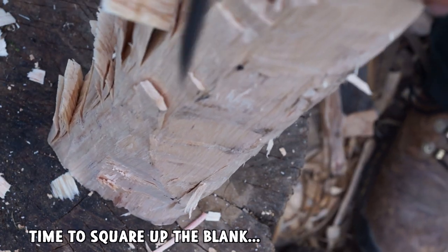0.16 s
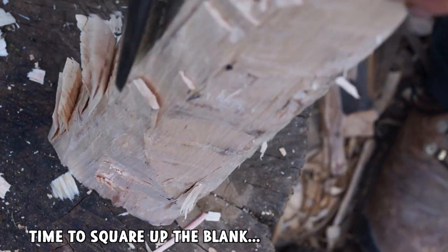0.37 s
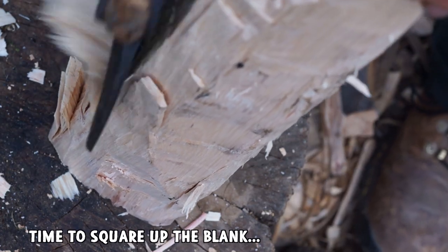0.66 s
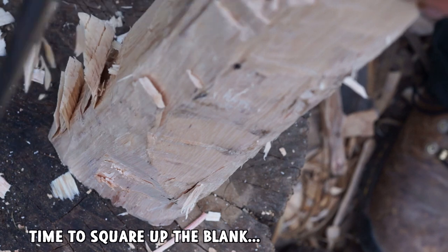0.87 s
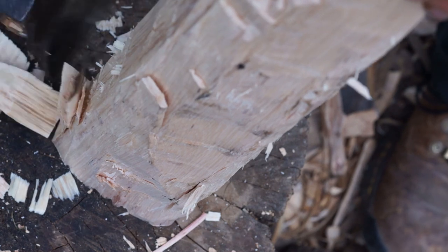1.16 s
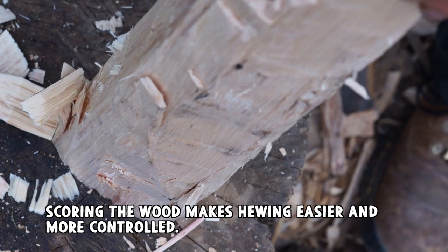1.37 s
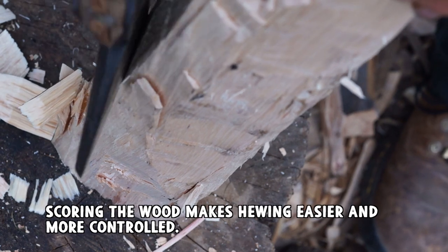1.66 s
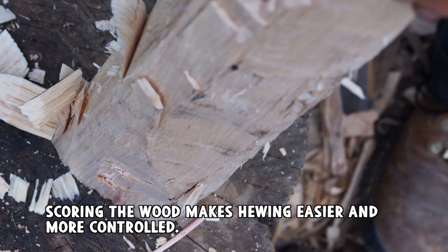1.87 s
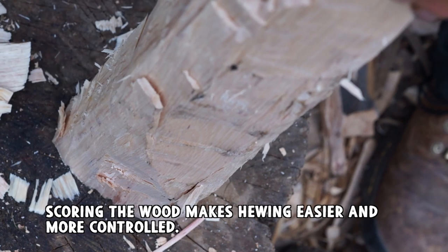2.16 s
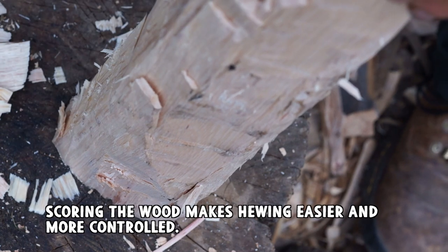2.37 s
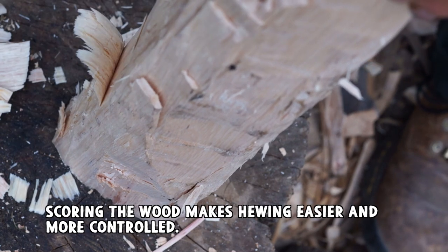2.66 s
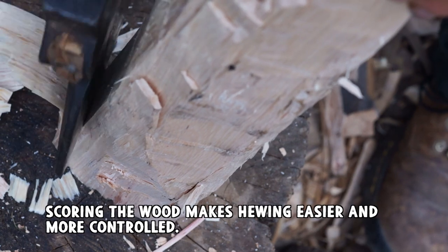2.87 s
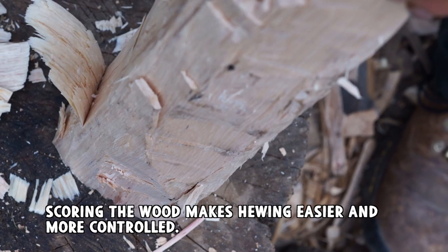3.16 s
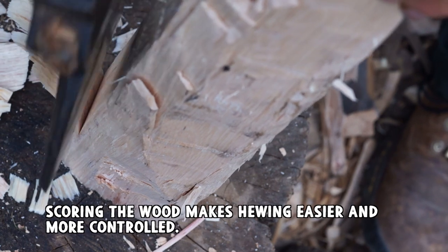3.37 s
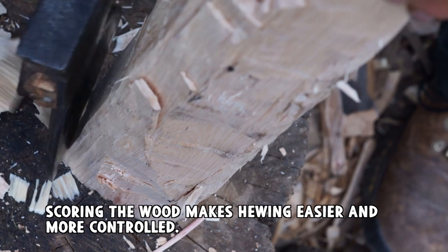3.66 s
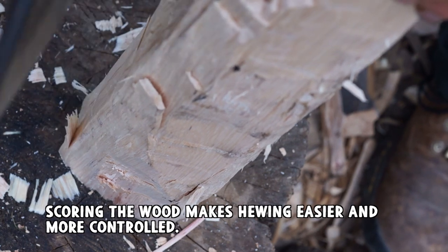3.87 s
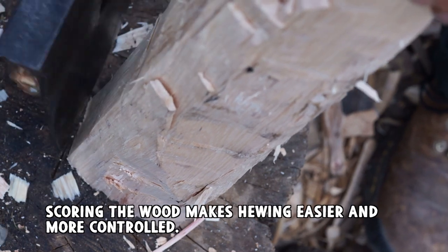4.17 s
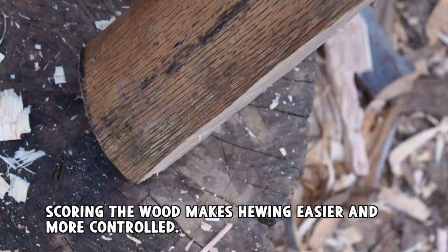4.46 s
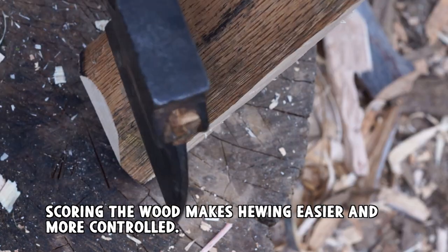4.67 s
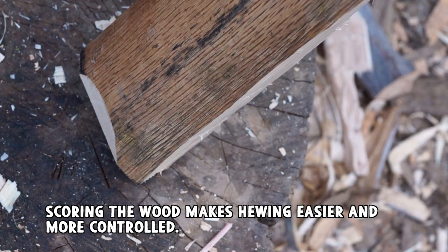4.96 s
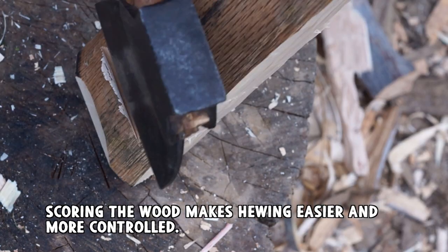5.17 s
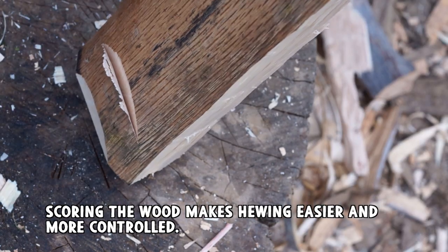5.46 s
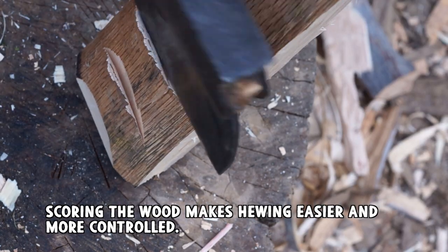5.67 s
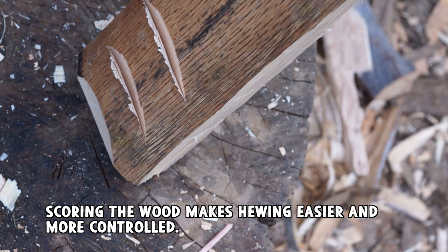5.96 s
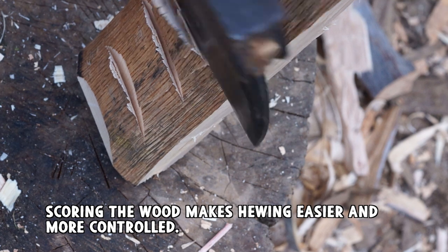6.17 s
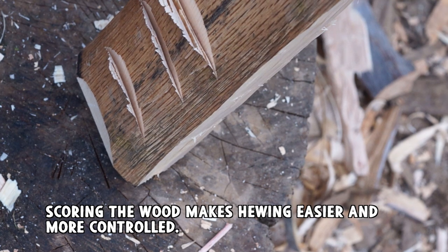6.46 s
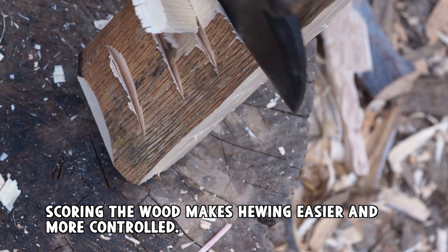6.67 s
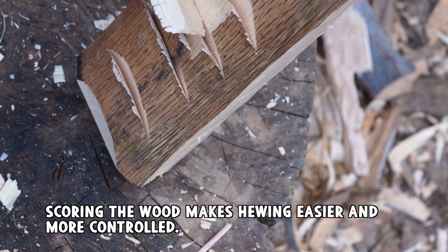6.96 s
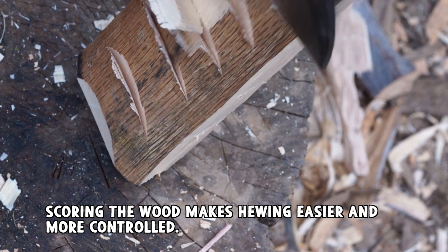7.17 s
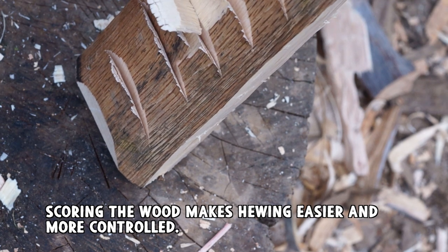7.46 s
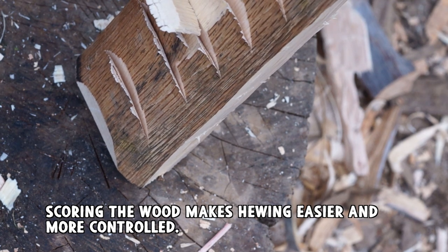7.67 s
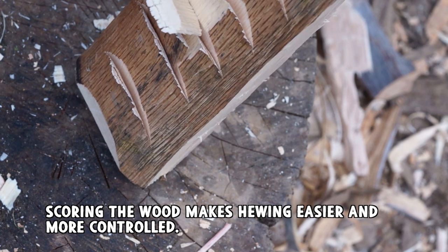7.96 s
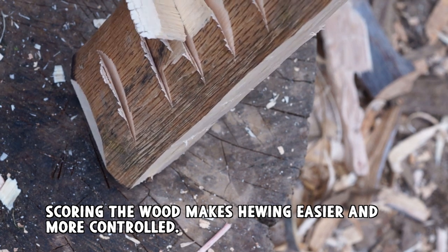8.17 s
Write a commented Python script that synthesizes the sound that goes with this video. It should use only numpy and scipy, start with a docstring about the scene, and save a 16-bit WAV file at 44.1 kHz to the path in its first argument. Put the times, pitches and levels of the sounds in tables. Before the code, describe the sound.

A hatchet first hews along the grain of a wood blank, with sharp dry knocks, ripping fibres and clattering chips. Then the blank is settled with a soft rustle and scored by regular square chops, more solid and resonant, shaking the block slightly while the blade sings faintly between them. It is heard very close outdoors, over faint air, with a brief diffuse yard echo that hangs on after the blows.

```python
"""Outdoors in a yard, close to the microphone, a hatchet works a green wood blank on a chopping block.
First it hews along the grain: each blow excites the blank's modes, shavings tear loose as bursts of
clicks, and chips snap and fall. Then it scores the bark side with short hard chops that shake the block;
the steel rings, as a sum of damped modes, when it comes free, and at times swells up again.
A limiter ducks every blow, so the yard's echo, shaped from scattered noise, hangs on after it."""
import sys
import numpy as np
from scipy import signal
from scipy.io import wavfile
from scipy.ndimage import uniform_filter1d

SR = 44100
rng = np.random.default_rng(int(sys.argv[2]) if len(sys.argv) > 2 else 0)


def master_out(mix):
    """Clip the mix to full scale and print it as 16-bit PCM to the path in sys.argv[1]."""
    frames = np.transpose(np.atleast_2d(mix))
    ceiling = np.clip(frames, -1, 1)
    pcm = np.round(ceiling * 32767).astype(np.int16)
    wavfile.write(sys.argv[1], SR, pcm)


N = 366912  # samples in the scene
LIFE = 28672  # samples in the life of one event
T = np.arange(LIFE) / SR  # time in that life, s

# Spectrum of the still outdoor air. Each row: frequency in Hz, relative density in dB per Hz.
AIR_SPECTRUM = [(15, -54), (25, -2), (82, -1), (416, -9), (714, -15), (1740, -18.5), (2350, -22.5),
                (3250, -15), (3920, -22), (4490, -13.5), (5280, -24), (14800, -24), (16000, -31)]
AIR_DB = -59.5
# Bark and shavings rustling under the hand. Each row: frequency in Hz, relative density in dB per Hz.
RUSTLE_SPECTRUM = [(60, -11), (200, 1.5), (500, 3), (900, -5), (1700, -1), (2500, -13), (6000, -13),
                   (16000, -29)]
# The hand settles the blank on the block, rubbing over bark and shavings.
# Each row: start in seconds, length in seconds, level in dB.
GRIPS = [(4.38, .5, -60.5)]
GRIP_RISE_S, GRIP_T60_S = 0.07, 0.71
# From CHANGE_S the thin whine stops and a faint steady rustle begins.
CHANGE_S, STEADY_RUSTLE_DB = 4, -66

# Decay of the yard's echo. Each row: frequency in Hz, t60 in seconds.
YARD_T60 = [(100, 0.07), (500, .5), (2000, 0.5834), (5000, 0.3762), (14000, 0.38)]
# Colour of the yard's echo. Each row: frequency in Hz, gain in dB.
YARD_COLOUR = [(100, 1.8), (300, 0.83), (1000, -2.2), (2300, -0.19), (5000, -1.1), (14000, -1.1)]

# Showers of loose crumbs ticking on the block.
# Each row: start in seconds, length in seconds, level in dB before the common trim.
CRUMB_SHOWERS = [(.3, .3, -49.5), (.8, 0.062, -50), (1.24, 0.17, -44), (2.12, .04, -52), (2.6, 0.034, -62),
                 (3.73, 0.034, -43), (4.44, 0.03, -53.5), (4.93, .05, -58), (5.95, 0.074, -59),
                 (6.36, 0.18, -58)]
# A shower builds quickly and dies away; a few stray crumbs tick all the time (level before the trim).
CRUMB_RISE_S, CRUMB_T60_S, STRAY_CRUMBS_DB = 0.012, 0.54, -67
# The blade or a shaving scraping over the wood.
# Each row: start in seconds, level in dB, pitch in Hz, length in seconds.
SCRAPES = [(0.744, -21, 4750, 0.042), (.752, -24, 2600, 0.038), (0.829, -33, 4500, 0.024),
           (1.745, -51, 9050, 0.025), (3.369, -47.5, 4580, 0.043), (4.208, -52, 1100, 0.025),
           (4.24, -60, 4500, 0.024)]
# The loudest splinters snapping and chips landing.
# Each row: start in seconds, level in dB, pitch in Hz, decay time to 1/e in seconds.
CHIPS = [(0.258, -8.5, 5200, .0005), (.389, -30.5, 1450, 0.0026), (0.415, -34, 3320, 0.0082),
         (.435, -16.5, 2480, 0.0022), (0.456, -15, 2980, 0.0011), (0.543, -34.5, 4150, .005),
         (0.5983, -39, 4630, 0.0039), (.671, -42.5, 3800, 0.011), (0.87, -31.5, 5000, .0013),
         (0.876, -40, 2560, 0.003), (0.895, -36, 3840, 0.0026), (.902, -33, 5830, 0.0012),
         (1.105, -35.5, 4440, 0.0026), (1.137, -36, 4530, .0018), (1.18, -6, 4720, 0.0012),
         (1.196, -14, 3570, 0.0027), (1.264, -36, 1980, .0035), (1.345, -39, 3000, 0.0016),
         (1.397, -23.5, 2250, 0.0017), (1.453, -39.5, 7100, 0.0011), (2.605, -30.5, 3400, 0.0051),
         (3.781, -34.5, 3380, .0036), (3.886, -40.5, 2500, 0.0046), (3.967, -43, 3060, .012),
         (5.006, -35, 1660, 0.0022), (4.957, -43, 5500, .001), (5.06, -45.5, 3440, 0.0039),
         (6.094, -48.5, 2900, 0.0031), (6.623, -35, 2500, 0.002), (8.228, -47, 2140, .004)]

# The blank knocking on the block.
# Each row: start in seconds, thud level in dB, thud pitch in Hz, thud t60 in seconds, clack level in dB.
KNOCKS = [(.268, -27.5, 252, 0.091, -31), (.746, -18, 371.6, 0.13, -42), (.764, -19.5, 347, 0.064, -40),
          (1.176, -22, 730, 0.022, -13), (1.211, -21.5, 264, .05, -32), (1.655, -15, 410, .025, -24),
          (2.056, -18, 910, 0.065, -19), (2.085, -17, 333, 0.041, -18), (2.506, -19, 387, 0.021, -29),
          (2.903, -23, 602, 0.055, -45), (3.308, -19, 380, .03, -36), (4.135, -7.5, 360, 0.058, -11),
          (4.173, -13, 360, 0.024, -26), (4.597, -13, 765, 0.11, -26), (4.735, -38.5, 763, .08, -42),
          (5.275, -45, 805, .08, -50), (7.9027, -29, 802, 0.089, -51)]
# The clack, built on the blank's own main note. Each row: frequency in Hz, relative level in dB, t60 in seconds.
CLACK_MODES = [(610, -9.5, 0.021), (1020, 4.5, 0.049), (1296, -8, 0.036), (2510, -17, 0.032)]

# The steel ringing as the blade comes free, or swelling up again. Each row: start in seconds,
# ring level in dB, relative level of the lowest mode in dB, t60 in seconds.
STEEL_RINGS = [(2.11, -40, -20, 0.62), (2.3, -44, -24, 0.57), (2.95, -51, 1, 0.29), (3.391, -46, -14, 0.19),
               (3.788, -47, -12, 0.28), (4.25, -46, -20, 0.31), (5.24, -54, 3, .9), (5.43, -54, -20, .7),
               (5.759, -51, 9, 0.39), (6.281, -45, -6, 0.67), (6.47, -47, -16, 0.64), (6.832, -45, 3, 1.1),
               (7.361, -51, -2, 0.76), (7.878, -48, -3, .8)]
# The steel head's higher modes. Each row: frequency in Hz, relative level in dB, share of the ring's t60.
STEEL_MODES = [(4605, -1.5, 1), (4614, -3, 1), (6240, -25, .4), (7700, -21, .3), (9060, -22, .3)]
# The lowest mode of the steel head is damped by the handle.
STEEL_LOW_HZ, STEEL_LOW_T60_S = 2570, 0.26
# The ring swells and sinks as the head turns in the air: rms swing and time between its turning points.
SWELL_DB, SWELL_S = 1.2, .1

# Shavings tearing off, and one landing, as bursts of clicks.
# Each row: start in seconds, level in dB, fade t60 in seconds, treble tilt in dB an octave.
SHAVINGS = [(0.2575, -10.5, .14, 0.4), (.434, -24.5, .11, -1.5), (.721, -1.5, 0.1, 0.9),
            (1.161, -14.5, 0.066, -1), (1.182, -10, .1, -1), (1.646, -14.5, .065, -2.5),
            (2.038, -11.5, 0.07, 0.5), (2.068, -19, 0.11, -1.5), (2.169, -30, 0.089, 2),
            (2.488, -11.5, .074, 0.5), (2.887, -14.5, 0.089, -0.4), (3.297, -21, 0.071, -1),
            (3.699, -13, 0.12, -2), (4.128, -13, 0.12, -3.5)]
RIP_S = .012  # each burst runs at full strength for this long
# Fibres clicking in these bursts. Each row: frequency in Hz, relative density in dB per Hz.
FIBRE_SPECTRUM = [(60, -23.5), (200, -6.5), (450, 2), (1000, 0.5), (2000, -6), (3700, 2), (6000, -6.5),
                  (10000, -3.5), (16000, -12.5)]

# Fibres crushed by the edge. Each row: frequency in Hz, relative density in dB per Hz.
BITE_SPECTRUM = [(60, 3.5), (300, -2), (900, 2), (2000, 4.5), (4000, 1), (6000, -4.5), (10000, -7.5),
                 (16000, -15.5)]
# The heavy block rocking. Each row: frequency in Hz, relative density in dB per Hz.
BOOM_SPECTRUM = [(20, -31), (45, -9.5), (64, 1.5), (80, 3.5), (105, -6.5), (170, -11), (350, -24),
                 (700, -36.5), (2000, -74)]
# The block's own long notes, woken by square chops.
# Each row: frequency in Hz, relative level in dB, t60 in seconds.
BLOCK_MODES = [(442, -10, 0.37), (546, -7, 0.33), (880, 1, 0.35), (1340, -16, .3), (1885, -1, 0.41),
               (1917, -3, 0.55), (3140, -4, 0.39)]
# The blank laid flat. Each row: frequency in Hz, relative level in dB, t60 in seconds.
FLAT_MODES = [(356, -7.5, 0.061), (620, -13.5, 0.059), (740, -11.5, 0.016), (859, 1, 0.038),
              (1180, 6.5, 0.015), (1337, 5.5, 0.029), (1520, -4, 0.011), (1920, 1, 0.046),
              (2150, -18, 0.02), (3200, 2.5, 0.02), (3653, -0.5, 0.022), (4030, 3, 0.013)]
# Chops across the grain. Each row: start in seconds, force in dB, the blank's loudest note in Hz,
# that note's level in dB before a common trim, its t60 in seconds, treble tilt in dB an octave,
# block boom in dB, splinter spray in dB, block ring in dB.
SCORES = [(4.5906, -3, 840, -9, 0.14, -0.6, -36.5, -33, -37),
          (5.14, -4, 850, -11, 0.065, -0.4, -35, -38, -41),
          (5.655, -8, 1270, -34, 0.044, -0.8, -34, -43.5, -43),
          (6.167, -6, 2040, -16, 0.047, .5, -34.5, -38, -41),
          (6.697, -5, 1323, -7.5, .07, 1, -36, -37.5, -35),
          (7.242, -6.5, 1190, -21, 0.036, 1.5, -35.5, -49, -35),
          (7.7703, -8.5, 1850, -5.5, 0.046, 0.1, -36, -45, -30)]
# Crushed fibres go on splintering around the buried edge.
SPRAY_HOLD_S, SPRAY_T60_S = 0.059, 0.59

# The blank on end, before each blow's pitch factor and brightness.
# Each row: frequency in Hz, relative level in dB, t60 in seconds.
ON_END_MODES = [(240, -19, 0.02), (467, -11.5, 0.033), (905, -2, 0.032), (1070, 6, 0.015), (1700, -8, 0.01),
                (2740, -10, 0.014), (3276, 2.5, .022), (3540, -3.5, 0.0097), (4510, -4, 0.043),
                (6080, -15.5, 0.015), (8030, -23, 0.017), (8900, -18, 0.025)]
# Blows along the grain. Each row: start in seconds, force in dB, factor on the blank's pitch,
# fibre bite in dB relative to the wood, block boom in dB, brightness of the blank in dB an octave.
HEWS = [(0.2497, -10, 0.96, -17, -52, 0), (0.7171, -14, 0.89, -5, -61, -2.5),
        (1.1567, -5, 1.01, -4, -45, -.5), (1.6411, -6, 1.02, -2, -43, -3), (2.0304, -9, 1, -12.5, -45, 0.5),
        (2.487, -8.5, 1.03, -8.5, -48, .5), (2.884, -8.5, 1.04, 1, -49, 2.5),
        (3.2966, -13.5, 1.03, -9.5, -45.5, 2.5), (3.697, -8, 0.99, -7, -43.5, 1),
        (4.1241, -5, 0.99, -2.5, -43.5, -2.5)]

EDGE_HZ = 15950  # upper band limit


def amp(db):
    """Level law: an amplitude ratio is ten to the power of decibels over twenty."""
    return 10 ** (np.asarray(db) / 20)


def read(points, hz):
    """Interpolation: a table's value on a log-frequency axis."""
    f, value = np.transpose(points)
    return np.interp(np.log(hz + 1), np.log(f), value)


def evened(x):
    """Normalisation by mean power: scales to rms 1."""
    return x / np.sqrt(np.mean(x ** 2) + 1e-20)


def sized(x, size=176):
    """Normalisation by short-time power: scales so that the loudest 4 ms have rms 1."""
    loudest = uniform_filter1d(x ** 2, size, mode="constant").max()
    return x / np.sqrt(loudest + 1e-20)


def stroke(length, t60):
    """Sustained drive and exponential decay: holds for a length, then loses 60 dB in t60."""
    return np.exp(-np.log(1000) * np.clip((T - length) / t60, 0, 4))


def fade(t60):
    """Exponential decay: loses 60 dB in t60 from the start."""
    return stroke(0, t60)


def spells(rows, rise_s, t60):
    """Envelope of a recurring gesture: each swells, lasts its length and decays exponentially."""
    t = np.arange(N) / SR
    total = np.zeros(N)
    for s, length, db in rows:
        rise = np.clip((t - s) / rise_s, 0, 1)
        decay = amp(-60 * np.maximum(t - s - length, 0) / t60)
        total += amp(db) * rise * decay
    return total


def add(mix, s, sound):
    """Superposition: adds a sound to the mix at time s."""
    part = mix[max(round(s * SR), 0):][:len(sound)]
    part += sound[:len(part)]


def colour(x, points, tilt_db=0, size=4096):
    """Minimum-phase filtering: a causal filter with the given spectrum, tilted about 2 kHz."""
    hz = abs(np.fft.fftfreq(size, 1 / SR))
    octaves = np.log2(np.maximum(hz, 500) / 2000)  # the tilt stays level below 500 Hz
    log_gain = np.log(amp(read(points, hz) + tilt_db * octaves))
    # the Hilbert transform of the log gain gives the minimum phase
    taps = np.fft.ifft(np.exp(np.conj(signal.hilbert(log_gain)))).real
    return signal.oaconvolve(x, taps[:size // 2])[:len(x)]


def ring(modes, pitch=1):
    """Modal synthesis: a sum of damped sines of alternating sign, each level varied at random per strike."""
    chance_db = rng.standard_normal(len(modes))
    total = np.zeros(LIFE)
    for k, (hz, db, t60) in enumerate(modes):
        swing = np.sin(2 * np.pi * hz * pitch * T)
        total += (-1) ** k * amp(db + chance_db[k]) * fade(t60) * swing
    return total


def crackle(per_s, spread_db, size=LIFE):
    """Random impulse process: clicks of either sign, a few much larger than the rest."""
    chance, strength = rng.random((2, size))
    at = np.flatnonzero(chance < per_s / SR)
    clicks = np.zeros(size)
    clicks[at] = amp(spread_db * np.minimum(-np.log(1 - strength[at]), 4))
    return clicks * (2 * rng.integers(0, 2, size) - 1)


def background():
    """Filtered noise for still air and rustling, with a faint thin, wavering sine whine until CHANGE_S."""
    t = np.arange(N) / SR
    shared, apart, rub, waver = rng.standard_normal((4, N))
    mid = evened(colour(shared, AIR_SPECTRUM))
    side = 0.23 * evened(colour(apart, AIR_SPECTRUM))
    air = amp(AIR_DB) * np.array([mid + side, mid - side])
    steady = amp(STEADY_RUSTLE_DB) * (t > CHANGE_S)
    rustle_level = np.hypot(spells(GRIPS, GRIP_RISE_S, GRIP_T60_S), steady)
    rustle = evened(colour(rub, RUSTLE_SPECTRUM)) * rustle_level
    whine_hz = 4328 + 22 * evened(uniform_filter1d(waver, size=300))
    whine = amp(-67) * np.sin(2 * np.pi * np.cumsum(whine_hz) / SR) * (t < CHANGE_S)
    return air + rustle + whine


def yard(x, spread=0.34):
    """Diffuse reverberation: band energy lingers and returns as random scatter, mostly alike at both ears."""
    hz, t, z = signal.stft(x, SR, nperseg=256)
    power = uniform_filter1d(abs(z) ** 2, size=5, axis=0)
    keep = amp(-60 * 2 * t[1] / read(YARD_T60, hz))  # share of power kept per frame, hence the 2
    linger = np.array([signal.lfilter([0, 1 - k], [1, -k], band) for k, band in zip(keep, power)])
    mid, side = signal.stft(rng.standard_normal((2, N)), SR, nperseg=256)[2]
    scatter = np.array([mid + spread * side, mid - spread * side]) / np.std(mid)
    gain = amp(read(YARD_COLOUR, hz))[:, None]
    return signal.istft(scatter * np.sqrt(abs(linger)) * gain, SR, nperseg=256)[1][:, :N]


def woodpile(x, t60=0.39):
    """Sparse reflection: separate echoes from stacked wood nearby make the tail grainy and hollow."""
    slaps = crackle(per_s=900, spread_db=2.5) * fade(t60) * (1 - fade(0.044))
    slaps = colour(slaps, [(100, 2), (2500, -1), (6000, -3), (14000, -12.5)])
    return signal.fftconvolve(x, slaps / np.linalg.norm(slaps))[:N]


def near(x, side_db, size=130):
    """Early reflection: the block's top reflects a little differently to the left and to the right."""
    taps = rng.standard_normal(size * 2) * np.linspace(1, 0, size * 2)
    reflected = signal.oaconvolve(x, taps / np.linalg.norm(taps))[:N]
    side = colour(reflected, [(100, -27), (400, -11.0), (1200, 4), (3000, 1.5), (9000, -13)])
    return x + amp(side_db) * np.array([side, -side])


def crumbs(size=900):
    """Sparse impulses through resonant grains: tiny ticks in four sizes, swelling in showers."""
    ticks = np.zeros(N)
    for hz in np.geomspace(1600, 5200, num=4):
        body = [(hz / 8, -26), (hz / 1.5, -11), (hz, 0), (hz * 1.26, -11), (hz * 5, -19)]
        grain = colour(rng.standard_normal(size) * fade(0.024)[:size], body)
        ticks += evened(signal.oaconvolve(crackle(per_s=11, spread_db=2.5, size=N), grain)[:N])
    level = amp(STRAY_CRUMBS_DB) + spells(CRUMB_SHOWERS, CRUMB_RISE_S, CRUMB_T60_S)
    return amp(-2.5) * evened(ticks) * level  # the common trim


def scrapes():
    """Friction: short rubs as dense random clicks through one resonance."""
    out = np.zeros(N)
    for s, db, hz, length in SCRAPES:
        rub = crackle(per_s=17000, spread_db=2.5) * np.sin(np.pi * np.minimum(T / length, 1))
        body = [(hz / 6, -32), (hz / 1.3, -17), (hz / 1.01, -13), (hz, 0), (hz * 1.06, -13), (hz * 3, -26)]
        add(out, s, amp(db) * sized(colour(rub, body)))
    return out


def chips(size=6000):
    """Impulsive excitation: each chip is a short cluster of clicks through its own broad resonance."""
    out = np.zeros(N)
    for s, db, hz, length in CHIPS:
        decay = np.exp(-T[:size] / length) + 0.099 * np.exp(-T[:size] / .018)
        clicks = crackle(per_s=7300, spread_db=4.5, size=size) * decay
        body = [(hz / 16, -22), (hz / 3, -8), (hz / 1.34, -4), (hz, 3), (hz * 1.49, -6), (hz * 2.4, -12),
                (hz * 6, -19)]
        add(out, s, amp(db) * sized(colour(clicks, body)))
    return out


def knocks():
    """Damped contact: a dull wood note among weaker modes, with a clack from the blank."""
    out = np.zeros(N)
    for s, db, hz, t60, clack_db in KNOCKS:
        modes = [(hz, 0, t60), (hz * 0.6, -5, t60 * 0.73), (hz * .38, -10, t60 * 1.3),
                 (hz * 1.23, -7, t60 * 0.63), (hz * 2.39, -9, t60 * 0.67)]
        thud = amp(db) * sized(ring(modes))
        add(out, s, thud + amp(clack_db) * sized(ring(CLACK_MODES)))
    return out


def steel():
    """Free vibration: the steel's damped modes sing as the blade comes free, or swell up again."""
    out = np.zeros(N)
    turns = np.arange(12) * SWELL_S
    for s, db, low_db, t60 in STEEL_RINGS:
        modes = [(hz, level, share * t60) for hz, level, share in STEEL_MODES]
        modes.append((STEEL_LOW_HZ, low_db, STEEL_LOW_T60_S))
        swell_db = SWELL_DB * np.interp(T, turns, rng.standard_normal(len(turns)))
        add(out, s, amp(db + swell_db) * ring(modes) * (1 - fade(0.019)))  # soft onset
    return out


def snaps(length, t60, count=14, size=700):
    """Impulsive resonance: single splinters snap within the burst, each a brief decaying sine."""
    out, t = np.zeros(LIFE), T[:size]
    for when, pitch, strength in rng.random((count, 3)):
        s = when * (length + .45 * t60)
        hz = 1500 * 5.5 ** pitch
        db = -8 * strength - 45 * max(s - length, 0) / t60
        add(out, s, amp(db) * np.exp(-t / 0.0012) * np.sin(2 * np.pi * hz * t))
    return out


def shavings():
    """Dense impulse bursts: shavings tear off, and one lands, as fibre clicks with louder snaps in them."""
    out = np.zeros(N)
    for s, db, t60, tilt_db in SHAVINGS:
        burst = crackle(per_s=5500, spread_db=4.0) * stroke(RIP_S, t60)
        burst = sized(colour(burst, FIBRE_SPECTRUM, tilt_db))
        add(out, s, amp(db) * (burst + amp(-6) * sized(snaps(RIP_S, t60))))
    return out


def boom():
    """Low-frequency rocking: the heavy block on the ground, as shaped noise that swells and decays."""
    rumble = evened(colour(rng.standard_normal(LIFE), BOOM_SPECTRUM))
    return rumble * fade(1.1) * (1 - fade(0.044))


def blow(modes, pitch, length, bite_db, drag, tilt_db=0):
    """Impact and drag: the edge shocks the blank, then crushes fibres that keep the wood ringing."""
    fibres = crackle(per_s=18000, spread_db=1.0) * stroke(length, t60=0.0081)
    push = drag * fibres / np.linalg.norm(fibres)
    push[0] += 1  # the first shock
    wood = signal.fftconvolve(push, ring(modes, pitch))[:LIFE]
    bite = sized(colour(fibres, BITE_SPECTRUM, tilt_db))
    return sized(sized(wood) + amp(bite_db) * bite)


def scoring():
    """Square impact: chops stop dead in the blank, which sounds a note, chatters on the block and splinters."""
    out = np.zeros(N)
    for s, db, hz, note_db, t60, tilt_db, boom_db, spray_db, ring_db in SCORES:
        rattle = crackle(per_s=4000, spread_db=4.5) * fade(0.13)
        # where the blank is struck sets the note
        note_modes = [(hz, 0, t60), (hz * 0.77, -7, t60 * 0.76), (hz * 0.955, -8, t60 * .7)]
        note = amp(note_db) * sized(ring(note_modes))
        chop = blow(FLAT_MODES, 1, length=0.0051, bite_db=-2, drag=0.48, tilt_db=tilt_db)
        chatter = sized(colour(rattle, BITE_SPECTRUM, tilt_db - 3.0))
        splinters = crackle(per_s=3000, spread_db=2.5) * stroke(SPRAY_HOLD_S, SPRAY_T60_S)
        spray = sized(colour(splinters, BITE_SPECTRUM, tilt_db=-.5))
        wood = chop + amp(-9.5) * chatter
        block = amp(boom_db) * boom() + amp(ring_db) * sized(ring(BLOCK_MODES))
        add(out, s, amp(db) * wood + amp(-1.5) * note + block + amp(spray_db) * spray)
    return out


def hewing():
    """Glancing impact: where the edge lands on the upright blank sets how bright its modes ring."""
    out = np.zeros(N)
    for s, db, pitch, bite_db, boom_db, bright_db in HEWS:
        modes = [(hz, level + bright_db * np.log2(hz / 2000), t60) for hz, level, t60 in ON_END_MODES]
        wood = blow(modes, pitch, length=0.0053, bite_db=bite_db, drag=.25)
        add(out, s, amp(db) * wood + amp(boom_db) * boom())
    return out


def scene():
    """Superposition of direct and reflected sound: the woodwork and its echo over the quiet yard."""
    hews = hewing() + knocks()
    scores = scoring()
    splinters = shavings() + chips() + crumbs() + scrapes()
    spill = amp(-25) * hews + amp(-19) * scores + amp(-25.5) * splinters  # what reaches the surroundings
    close = hews + scores + splinters + steel() + .5 * woodpile(spill)
    # small wooden things radiate no deep bass
    close = signal.sosfilt(signal.butter(2, 42, "highpass", fs=SR, output="sos"), close)
    return near(close, side_db=-15.5) + yard(spill) + background()


def record(dry, limit_db=-19.0, recover_db_per_s=115, ceiling=0.4):
    """Gain control: a limiter drops at once, recovers steadily and rounds spikes; then the band limit."""
    power_db = 10 * np.log10(abs(uniform_filter1d((dry ** 2).mean(0), size=110)) + 1e-12)
    fall = np.arange(N) * recover_db_per_s / SR
    held_db = np.maximum.accumulate(power_db + fall) - fall  # peaks held, sinking at a steady rate
    over_db = np.maximum(held_db - limit_db, 0)
    ducked = dry / amp(uniform_filter1d(over_db, size=30))
    rounded = ceiling * np.tanh(ducked / ceiling)
    lowpass = signal.firwin(401, EDGE_HZ, window=("kaiser", 9), fs=SR)
    return signal.oaconvolve(rounded, lowpass[None], "same")


dry = scene()
out = record(dry)
master_out(out)
```